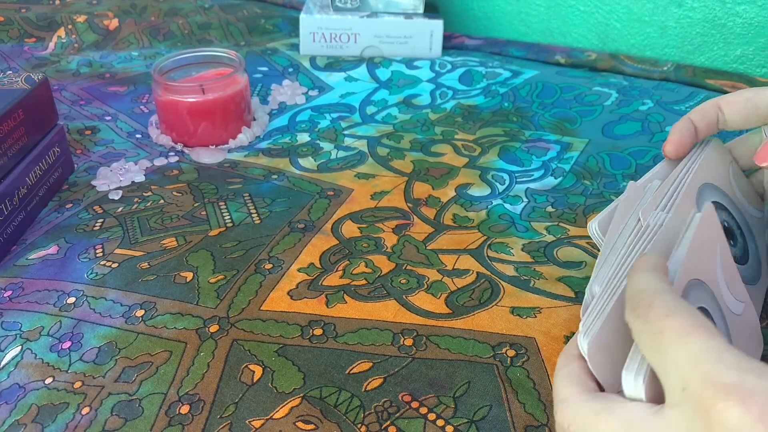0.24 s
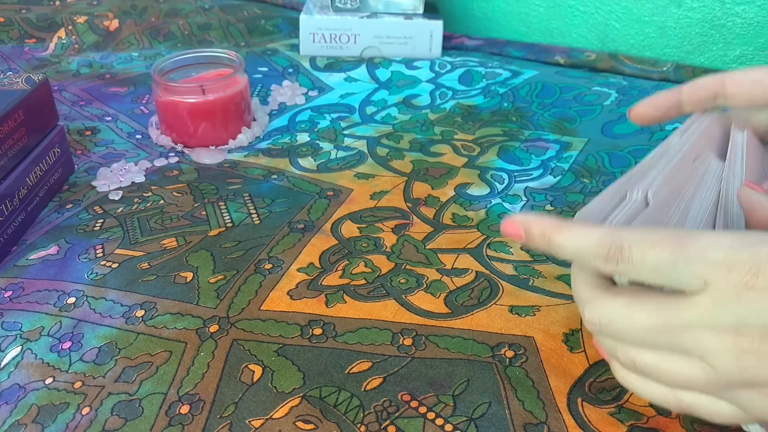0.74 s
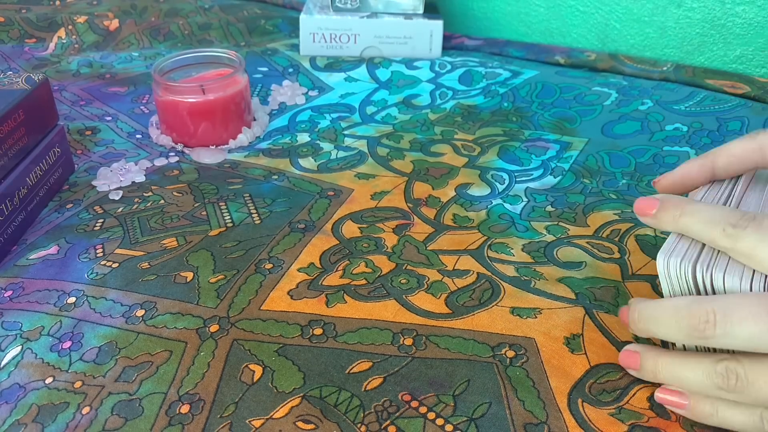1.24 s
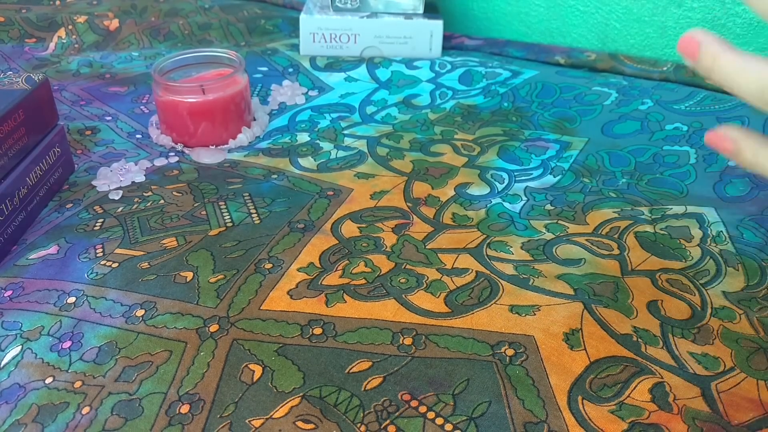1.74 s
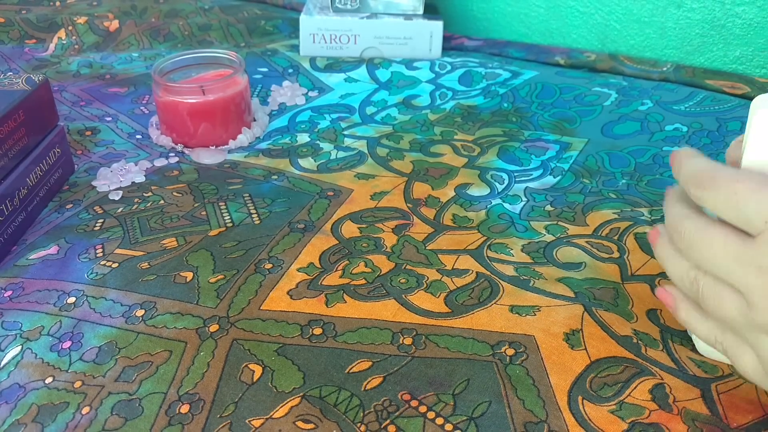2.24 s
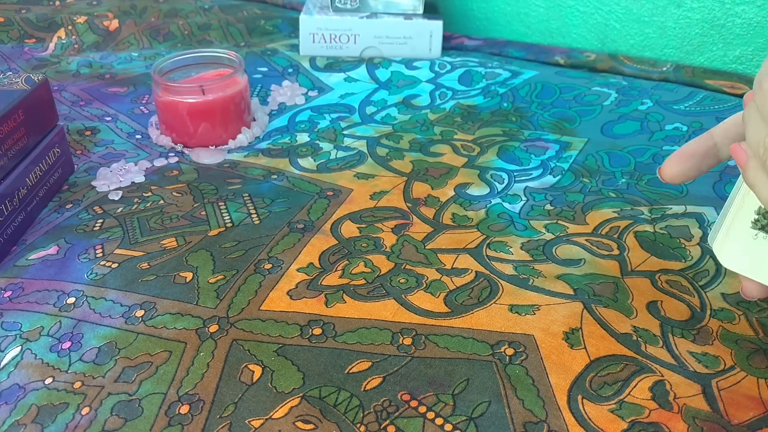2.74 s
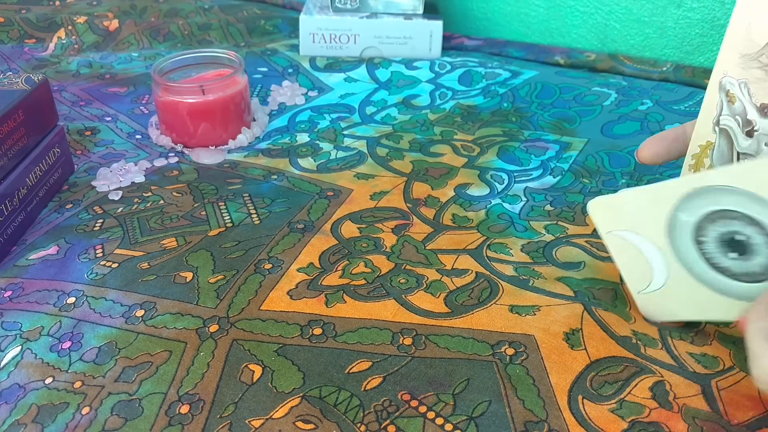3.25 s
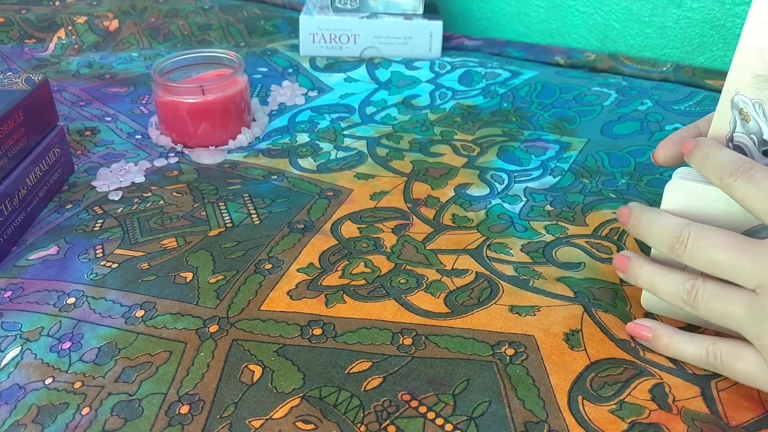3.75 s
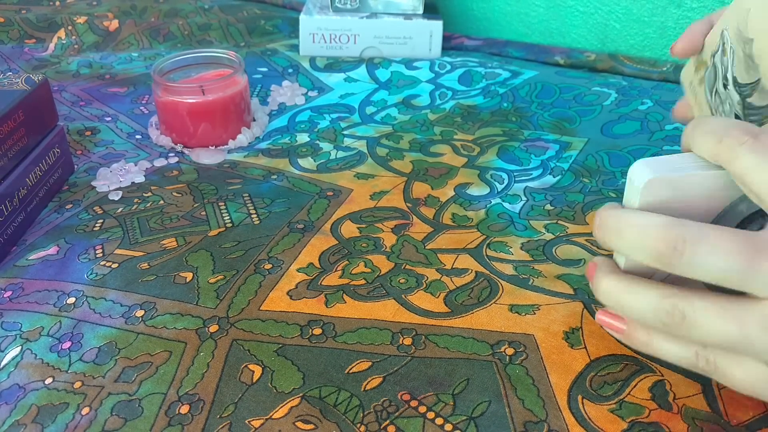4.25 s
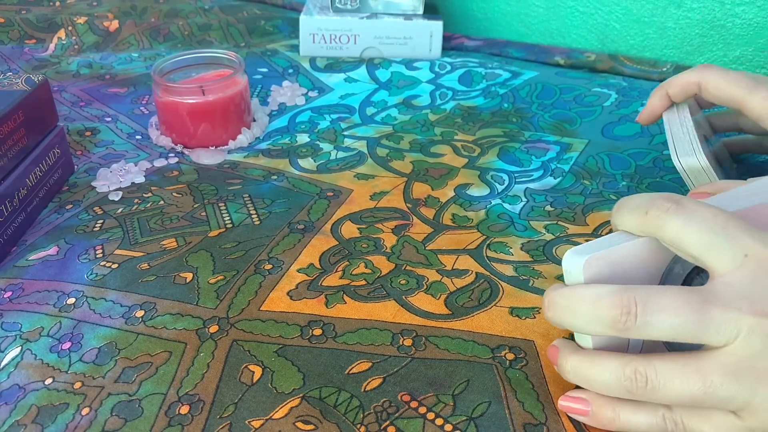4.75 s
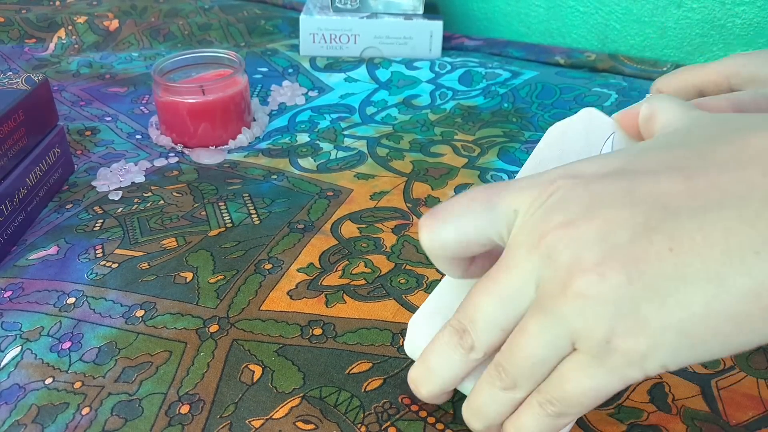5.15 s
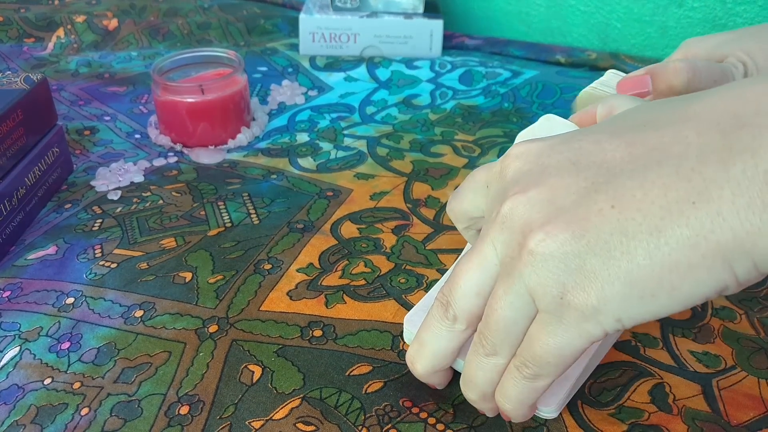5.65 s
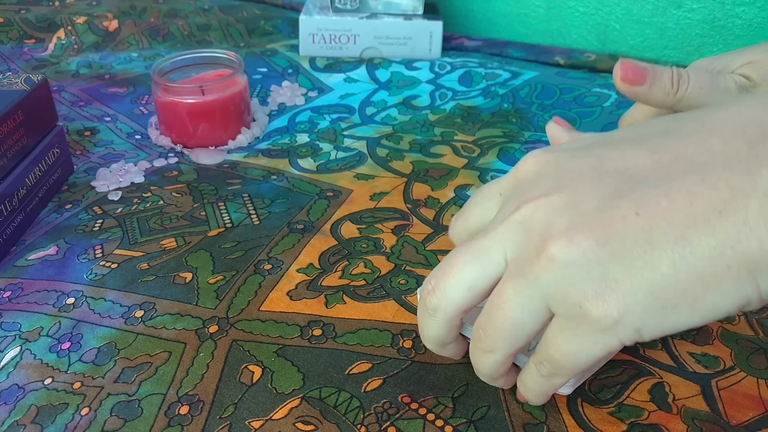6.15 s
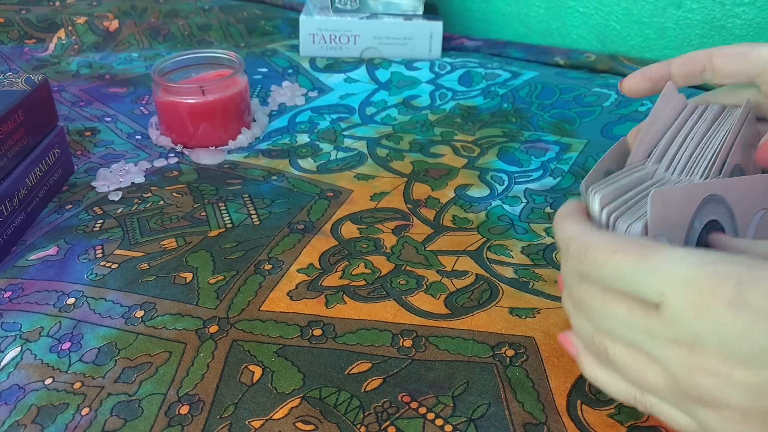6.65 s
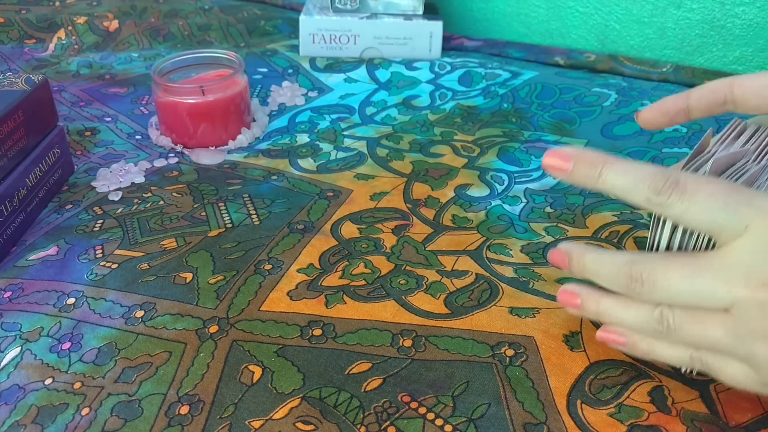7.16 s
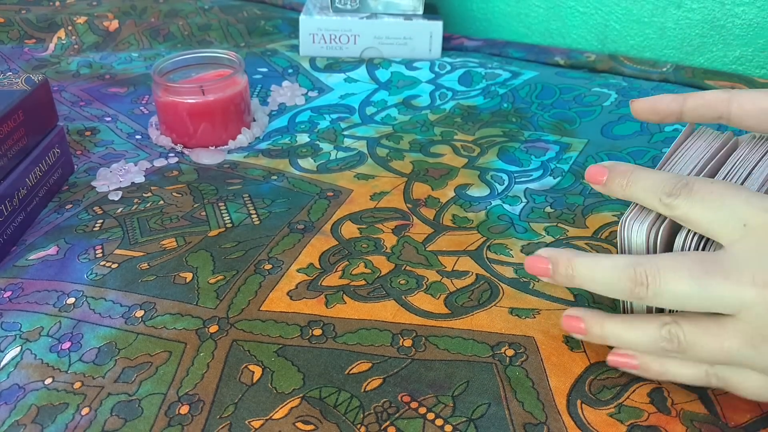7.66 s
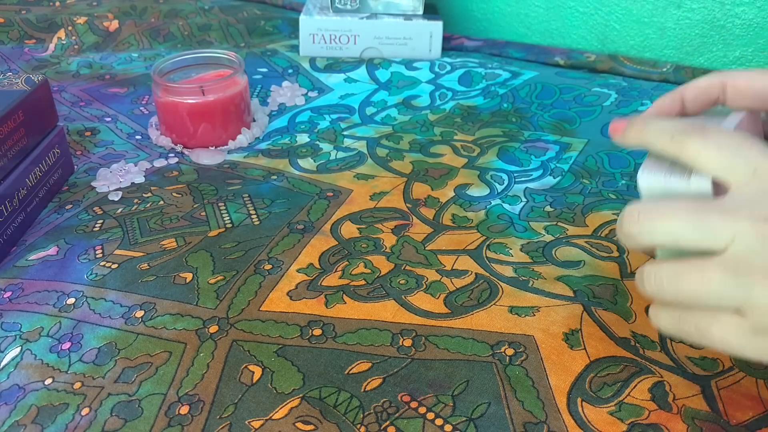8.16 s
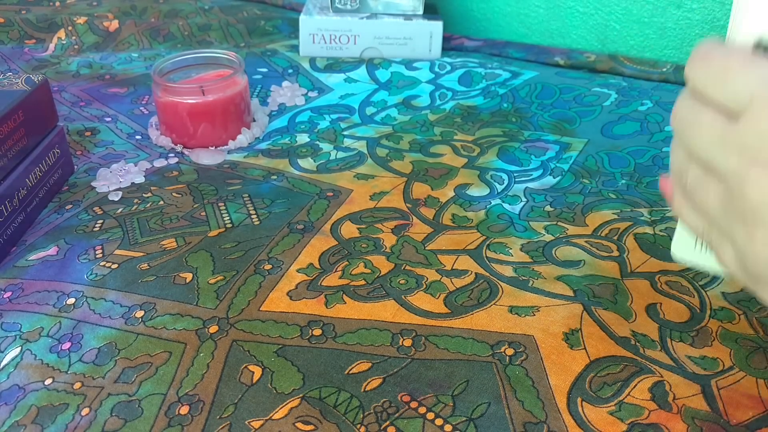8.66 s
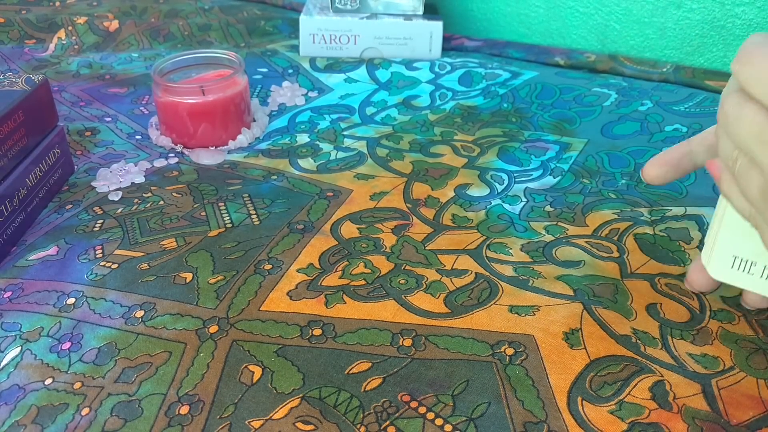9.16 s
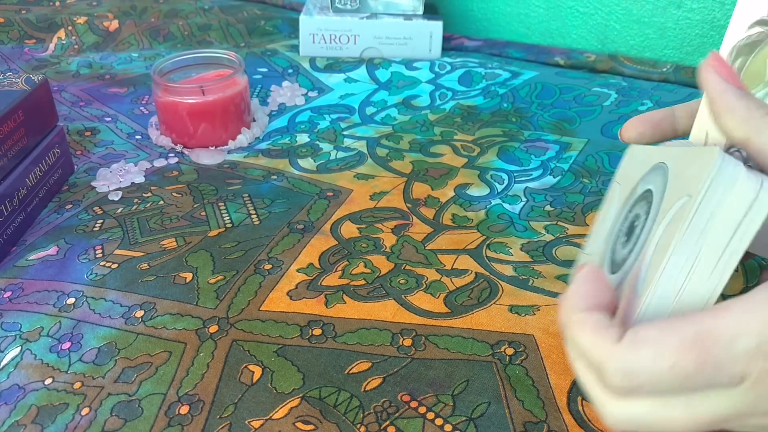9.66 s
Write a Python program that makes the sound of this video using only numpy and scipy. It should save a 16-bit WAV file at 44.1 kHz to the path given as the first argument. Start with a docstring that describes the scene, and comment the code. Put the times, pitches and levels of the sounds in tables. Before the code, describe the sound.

A deck of cards is handled close to a stereo microphone, a little to the right, in a nearly dry space. A low wavering motor hum, street rumble and soft hiss run throughout. Far, echoing dog barks come at 0 and 0.7 s. Cards click and knock sharply around 0.3 s, then brush and tap lightly until 1.5 s. At 2 s a distant two-tone car horn toots briefly. Small clicks come at 3.2-3.5 s, tiny faint peeps are scattered about, and a low rumble swells near 4.8 s. From 5.7 s the cards riffle: separate snaps thicken into a rapid, brightening crackle, loudest near 6.17 s, ending in a papery swish by 6.25 s. The background drops abruptly and creeps back over two seconds. Soft slides follow at 6.8-7.3 s, with a click at 8.36 s, faint barks at 8.2, 9.1 and 9.6 s, and a last tap at 9.8 s.

```python
"""Playing-card sounds: a deck shuffled by hand over a cloth-covered table, built from shaped noise and ringing.
Packets slide as grainy hiss, tap as struck bursts, and riffle once in a run of snaps.
Behind: wavering machine tones, street noise under hiss, a far dog's voiced barks, one two-tone car horn toot,
faint trilled peeps and one swell of low rumble.
The microphone's gain control ducks under the riffle and creeps back over two seconds."""
import sys
import numpy as np
from scipy import signal
from scipy.fft import rfft, irfft, next_fast_len
from scipy.io import wavfile
from scipy.ndimage import map_coordinates

SR = 44100
rng = np.random.default_rng(int(sys.argv[2]) if len(sys.argv) > 2 else 0)


def generate_wav(signal):
    """Clip the signal to [-1, 1] and save it as 16-bit WAV at the path in sys.argv[1]."""
    frames = np.transpose(np.atleast_2d(signal))
    scaled = np.clip(frames, -1, 1) * 32767
    pcm = np.round(scaled).astype(np.int16)
    wavfile.write(sys.argv[1], SR, pcm)


N = 437472

# Colours, bells and levels are relative dB; later gains and filters apply.
# three motors: (mean pitch [Hz], line width [Hz])
MOTOR_LINES = [(121, 2.69), (154.2, 3.95), (173.5, 6.98)]
# motor levels before swell: (time [s], first, second, third motor level [dB])
MOTOR_LEVELS = [(0, -49, -41.5, -61), (.6, -45.5, -49, -44.5), (1.2, -46, -42.5, -51),
                (2.2, -46.5, -42, -44), (3.2, -48, -46, -47), (4.4, -43.5, -45, -50.5),
                (5.5, -47.5, -44, -51), (6.3, -42, -51.5, -55), (8.2, -45.5, -42, -47),
                (9.2, -40.5, -46.5, -48), (9.9, -39.5, -45.5, -53)]
# weaker fan tones: (mean pitch [Hz], level [dB], line width [Hz])
FAN_LINES = [(244.4, -51.5, 7.04), (294.2, -51.5, 7.04), (309.2, -54.5, 8.13), (356.7, -56, 8.22),
             (413.7, -58, 9.16), (672.4, -61.5, 7.53)]
# street noise and hiss: (frequency [Hz], density [dB per Hz])
AIR_COLOUR = [(20, -33), (35, -24), (55, -9), (100, -0.5), (200, -6.5), (340, -5.5), (520, -13.5),
              (900, -17), (1600, -23), (1950, -22.5), (2300, -25), (2750, -26.5), (5000, -27.5),
              (8300, -31), (9800, -32), (11200, -39), (12400, -30.5), (13500, -38.5), (15000, -41.5)]
# left-right correlation of the background noise, channels opposite near 2.3 kHz:
# (frequency [Hz], correlation [-1..1])
NOISE_CORRELATION = [(130, 0.59), (280, 0.73), (640, 1), (1400, 0.84), (1950, -0.72), (2150, -1),
                     (2450, -1), (2700, 0.078), (3300, 0.74), (4500, -0.64), (6000, 0.063), (15000, -0.048)]
# far barks: (start [s], level [dB], pitch before arch [Hz], throat resonance shift [ratio])
BARKS = [(0.0, -45.5, 375, 1.06), (0.695, -43.5, 381.4, 1.04), (8.177, -42, 370.6, 1),
         (9.11, -41, 355.2, .91), (9.597, -48.5, 354, 0.93)]
# dog's throat: (frequency [Hz], density [dB per Hz])
THROAT_COLOUR = [(200, -33), (500, 4.5), (800, -4.5), (980, 2.5), (1090, 7.5), (1280, -3.5), (1650, -5),
                 (1950, -22), (4000, -42)]
# reverberation down the street: (frequency [Hz], t60 [s])
STREET_DECAY = [(300, 0.97), (750, .65), (1080, 0.94), (1700, 0.75), (6000, 0.13)]
# packets sliding over each other: (time at fastest [s], level [dB], stroke length [s])
SLIDES = [(0.023, -48, 0.039), (0.131, -47, 0.093), (0.567, -45, 0.14), (0.879, -49, 0.073),
          (1.105, -47.5, 0.068), (1.156, -37, 0.052), (1.297, -52.5, 0.23), (1.538, -55.5, 0.16),
          (1.906, -48, 0.075), (2.205, -48.5, 0.067), (2.963, -54, 0.11), (3.52, -56, 0.37),
          (4.545, -53, 0.023), (6.17, -23, 0.025), (6.223, -27, 0.038), (6.764, -39, 0.086),
          (7.051, -43.5, 0.14), (7.289, -43, 0.05), (8.159, -43.5, 0.051), (8.583, -50.5, 0.067),
          (8.882, -50.5, 0.054), (9.485, -51.5, 0.05), (9.912, -50.5, 0.12)]
# card's sliding face: (frequency [Hz], density [dB per Hz])
SLIDE_COLOUR = [(300, -17), (2000, -45), (3000, 3.5), (3800, 2), (5000, 0), (7300, 3.5), (10000, -1),
                (15000, -12.5)]
# packets landing on the deck or being squared: (time [s], edge click [dB over 10 ms], knock [dB over 10 ms],
# rattle length [s], brightness [dB per octave], body [dB],
# low ring [Hz], low ring [dB], high ring [Hz], high ring [dB])
TAPS = [(0.1574, -40.5, -40, 0.005, -3.5, -7.5, 1960, 4.0, 2750, 3),
        (0.2858, -28, -51, 0.0017, 4, 18, 3270, 10, 8300, 9),
        (0.2874, -31, -23.5, 0.004, -5.0, 5.5, 1000, 6, 1820, 7),
        (0.3018, -28.5, -56, 0.00052, -0.5, -3.5, 7140, 8, 8940, 0),
        (0.5753, -40.5, -55, 0.005, -2, -6, 6800, 5, 8940, 11),
        (1.088, -47, -37.5, 0.003, -13, -21, 7550, 5.0, 10000, 11.0),
        (1.4717, -49, -32.5, 0.004, -5, -26, 1120, 3, 7990, 7),
        (3.2357, -35, -54, 0.00094, -1, 3, 1840, 4.5, 7550, 9),
        (3.271, -49, -60, 0.00073, -3, -12, 1850, 7.0, 5700, 4),
        (3.3678, -38, -54, 0.0011, -5, -15, 6340, 3, 10000, 8.0),
        (3.466, -57, -35.5, 0.00354, 4, -15.5, 1000, 0, 10000, 12),
        (5.2719, -46, -60, 0.002, -5.5, -14, 1570, 10, 7140, 4),
        (5.712, -43.5, -40, 0.003, -8, -6, 1000, 2, 1320, 5),
        (5.826, -41.5, -35.5, 0.0026, -11, -10, 1400, 11, 10000, 12.0),
        (8.3587, -37.5, -49, 0.00292, -2.5, -9.5, 4070, 7, 8400, 7),
        (9.8142, -38.5, -42, 0.002, -3.5, -3, 3660, 6, 6380, 13.0)]
# cards flicking off the thumb; each bend rings at two pitches: (time [s], snap [dB over 10 ms],
# rattle length [s], brightness [dB per octave], body [dB],
# low ring [Hz], low ring [dB], high ring [Hz], high ring [dB])
RIFFLE = [(5.687, -31.5, 0.0033, -0.5, -2.5, 3420, 10, 7900, 2),
          (5.7405, -24.5, 0.0028, 0, 7.5, 1000, 3, 8940, 3),
          (5.775, -21, 0.0021, -1.0, 2.5, 3680, 8.5, 6960, 11.5),
          (5.785, -32, 0.002, -7, -16, 1750, 4, 7550, 5.0),
          (5.8564, -31.5, 0.0031, -2.5, -4, 2060, 5, 2750, 4),
          (5.8735, -19.5, 0.00151, -3.5, -5, 2440, 5.0, 4280, 2),
          (5.912, -18.5, 0.0013, 2.5, 14.5, 1000, 2, 8700, 12),
          (5.926, -24, 0.00246, 1, 2, 1480, 2, 6030, 6), (5.965, -26.5, 0.0025, 1, 3, 6750, 1, 8400, 6),
          (5.9805, -29, 0.00298, -2, 0.0, 3070, 3.5, 10100, 12),
          (5.9896, -19.5, 0.00055, -1.5, -2, 990, 1, 6840, 4.5),
          (5.999, -43, 0.0023, -2.5, -14, 5070, 4, 7990, 7),
          (6.0257, -18, 0.0022, -2.5, 7, 4270, 17, 6300, 5),
          (6.0279, -15, 0.00197, -1, -9, 2920, 18.5, 3850, 10.0),
          (6.0321, -17.5, 0.001, 1.5, 7, 4900, 12, 6750, 9),
          (6.0475, -17, 0.003, 4.5, -2.0, 4820, 7.5, 6380, 6.5),
          (6.054, -28.5, 0.002, -7.0, -5, 1000, 5.5, 7990, 10),
          (6.075, -20, 0.002, 2, 0, 4310, 11, 7550, 2.0), (6.088, -21, 0.00299, -4, -12, 6380, 3, 8450, 5),
          (6.1022, -17, 0.0023, 0.5, 5.0, 4310, 7, 7990, 8),
          (6.118, -31, 0.0015, -12, -19, 1000, 2.5, 8940, 7.5),
          (6.128, -15, 0.003, 1.5, 7.5, 3880, 9, 4820, 2), (6.1423, -20, 0.002, -6, -3, 1750, 9, 7990, 8),
          (6.1509, -12.5, 0.002, 2.5, 7.0, 2910, 11, 4260, 7),
          (6.155, -14.5, 0.002, 5, 8.5, 6750, 5, 9000, 3), (6.1714, -9.5, 0.002, 0, -3, 4560, -2, 5600, 9),
          (6.1739, -7.5, 0.00199, -2, -1, 4930, 3, 7550, 6),
          (6.184, -21.5, 0.004, 0, -1, 1000, 4.5, 5100, 1),
          (6.197, -22, 0.0055, -3.5, -9, 1750, 12, 6380, 4.5),
          (6.2197, -19.5, 0.00069, -6, -10.5, 6350, 10, 7990, 13)]
# held deck when knocked: (mean pitch [Hz], mean level [dB], t60 [s])
DECK_MODES = [(225, -3.5, 0.038), (309, -2.5, 0.052), (422, 8, 0.014), (623, -5.5, 0.029),
              (1186, -12, 0.025), (1690, -16, 0.0095)]
# card's snap: (frequency [Hz], density [dB per Hz])
SNAP_COLOUR = [(60, -43), (250, -4), (800, 1), (1550, 6.5), (2400, -1.5), (3300, 1.5), (5500, 2.5),
               (8300, 1.5), (11000, -4.5), (15000, -7.5)]
# faint far peeps: (time [s], level [dB], mean pitch [Hz], half length [s])
CHIRPS = [(0.338, -50, 3540, 0.0067), (0.387, -56, 3700, .007), (1.577, -58.5, 3110, 0.15),
          (2.36, -52, 3500, .02), (3.507, -46.5, 3500, 0.0086), (4.037, -47, 4050, 0.0084),
          (4.039, -49, 2830, 0.01), (4.098, -49, 3600, 0.0098), (5.452, -50.5, 5640, 0.019),
          (8.52, -57, 3000, 0.059), (8.822, -52, 3370, 0.013)]
# car's two horns: (pitch before sag and flutter [Hz], level [dB], start [s])
HORNS = [(425.5, -1, 2.0), (484, -0.5, 2.02)]
# horn flare: (frequency [Hz], gain [dB])
FLARE_GAIN = [(425, 5.5), (485, 0), (850, -1.5), (970, -2), (1350, 2.5), (1700, -4.5), (1930, -4),
              (2150, -15), (2420, -14), (3000, -9), (3400, -10), (3900, -13), (4600, -26), (6000, -12),
              (8000, -51)]
# low rumble: (frequency [Hz], density [dB per Hz])
RUMBLE_COLOUR = [(25, -34), (55, -2), (80, 7), (105, 17), (150, -5), (300, -52.5)]
# table top and a wall near the hands: (delay [s], gain [dB])
NEAR_ECHOES = [(.0021, -19), (.0046, -18), (.0098, -17)]
# reverberation near the table: (frequency [Hz], t60 [s])
ROOM_DECAY = [(200, 0.11), (2000, 0.16), (12000, 0.24)]
# hands' gain at the left port, opposite at the right: (frequency [Hz], gain [dB])
FACING_GAIN = [(400, -0.6), (750, -1), (1250, 0.5), (2200, 0), (4000, -2.5), (12000, -2.5)]
# port mismatch: (frequency [Hz], left phase lead [radians])
PORT_PHASE = [(35, 0.49), (70, 2.02), (130, 1.81), (290, 1.02), (640, 0.95), (1300, -0.21), (2100, 0)]

BARK_S = 0.12
SLIDE_RISE_SHARE = 0.69
RATTLE_REF_S = 0.0019
BODY_HZ, BODY_OCTAVES, RING_OCTAVES = 1600, 0.42, 0.15
# riffle knocks grow with the snap and as the falling packets thicken
RIFFLE_KNOCK_DB, KNOCK_DB_PER_DB, KNOCK_DB_PER_S = -29.5, 0.5, 22.5
TOP_HZ = 15800


def amp(db):
    """Decibels to gain."""
    return 10 ** (np.asarray(db) / 20)


def unit(x):
    """Scale to rms 1."""
    return x / np.sqrt(np.mean(x ** 2) + 1e-20)


def along(points, hz):
    """Interpolate (Hz, value) points on a log-frequency axis."""
    f, v = np.transpose(points)
    return np.interp(np.log(hz + 1), np.log(f + 1), v)


def hump(hz, centre_hz, octaves):
    """A bell of height 1 on a log-frequency axis."""
    return np.exp(-.5 * (np.log2((hz + 1) / centre_hz) / octaves) ** 2)


def clock():
    """The time of each sample [s]."""
    return np.arange(N) / SR


def wobble(knots_per_s):
    """A smooth random curve through normal knots."""
    knots = rng.standard_normal(int(N * knots_per_s / SR) + 4)
    return map_coordinates(knots, [clock() * knots_per_s])


def filtered(x, response):
    """x through a complex response of frequency."""
    m = next_fast_len(N + SR // 2)
    return irfft(rfft(x, m) * response(np.fft.rfftfreq(m, 1 / SR)), m)[..., :N]


def causal(db):
    """Minimum-phase response with these gains: it rings only after it is struck."""
    cepstrum = irfft(np.log(amp(db)))
    half = len(cepstrum) // 2
    fold = np.r_[1, np.full(half - 1, 2), 1, np.zeros(half - 1)]
    return np.exp(rfft(cepstrum * fold))


def noise(colour, channels=2):
    """Unrelated coloured noises of rms 1."""
    white = rng.standard_normal((channels, N))
    return unit(filtered(white, lambda hz: amp(along(colour, hz))))


def burst(x):
    """Scale a short sound to the energy of 10 ms at rms 1."""
    return x * np.sqrt(SR / 100 / np.sum(np.mean(np.atleast_2d(x) ** 2, 0)))


def reverb(x, decay):
    """A diffuse stereo tail in which each frequency dies at its own speed."""
    hz, t, z = signal.stft(rng.standard_normal((2, SR)), SR, nperseg=256)
    dying = amp(-60 * t / along(decay, hz)[:, None])
    tail = signal.istft(z * dying, SR, nperseg=256)[1]
    return signal.fftconvolve(np.atleast_2d(x), tail / np.linalg.norm(tail[0]), axes=1)[:, :N]


def tone(hz, width_hz, waver):
    """A line of rms 1 that wavers in strength and phase."""
    drift = np.cumsum(wobble(9)) * np.pi * width_hz / SR
    strength = 1 + waver * wobble(14)
    return unit(strength * np.sin(2 * np.pi * hz * clock() + drift))


def hum(fans_db=-2, left_db=0.73, swell_db=1.6, swell_knots_per_s=2.52, diffuse=0.65):
    """Three motors swell and sink over a cluster of fan tones that arrive from all round."""
    time_s, *levels = np.transpose(MOTOR_LEVELS)
    motors = np.zeros(N)
    for (hz, width_hz), db in zip(MOTOR_LINES, levels):
        level_db = np.interp(clock(), time_s, db) + swell_db * wobble(swell_knots_per_s)
        motors += amp(level_db) * tone(hz, width_hz, waver=0.45)
    ahead, around = (sum(amp(db) * tone(hz, width_hz, waver=0.55) for hz, db, width_hz in FAN_LINES)
                     for _ in range(2))
    fans = ahead + diffuse * np.array([around, -around])
    return (motors + amp(fans_db) * fans) * amp([[left_db], [-left_db]])


def air(level_db=-42.5):
    """Street rumble under a steady hiss; the mid-side balance sets the left-right correlation."""
    def mid_side(hz):
        turn = np.arccos(np.clip(along(NOISE_CORRELATION, hz), -1, 1)) / 2
        return np.array([np.cos(turn), np.sin(turn)])

    mid, side = filtered(noise(AIR_COLOUR), mid_side)
    return amp(level_db) * unit(np.array([mid + side, mid - side]))


def dog(rough=0.54, level_db=-1, direct_db=-3, opening=0.092):
    """Hoarse arched barks, mostly street echo; the throat's resonances rise and fall with the jaw."""
    t, out = clock(), np.zeros(N)
    rasp, jitter = noise(THROAT_COLOUR, channels=1)[0], wobble(150)
    for s, db, hz, throat in BARKS:
        on = (t >= s) & (t < s + BARK_S)
        arch = np.abs(np.sin(np.pi * (t[on] - s) / BARK_S))
        shift = throat * (1 + opening * (arch - np.pi / 4))
        phase = 2 * np.pi * np.cumsum(hz * (0.81 + .14 * arch + 0.015 * jitter[on])) / SR
        voiced = unit(sum(amp(along(THROAT_COLOUR, k * hz / shift)) * np.sin(k * phase)
                          for k in range(1, 8)))
        # reading speed shifts the rasp's resonances
        shifted_rasp = np.interp(s * SR + np.cumsum(shift), np.arange(N), rasp)
        hoarse = shifted_rasp * (1 + .5 * np.cos(phase))
        out[on] += amp(db + level_db) * np.sqrt(arch) * unit((1 - rough) * voiced + rough * hoarse)
    echo = reverb(out, STREET_DECAY)
    return amp(direct_db) * out + 0.17 * echo + 0.81 * echo.mean(0)


def slides(grain_db=3, pressure_db=1.3, level_db=-1):
    """Card faces rub: a grainy hiss that swells and fades with each stroke."""
    t = clock()
    stroke = np.zeros(N)
    for s, db, length_s in SLIDES:
        side_s = length_s * np.where(t < s, SLIDE_RISE_SHARE, 1 - SLIDE_RISE_SHARE)
        stroke += amp(db) * np.exp(-((t - s) / side_s) ** 2)
    grain = unit(amp(grain_db * wobble(700) + pressure_db * wobble(40)))
    return amp(level_db) * stroke * grain * noise(SLIDE_COLOUR)


def contacts():
    """Every card contact, in the columns of TAPS; riffle knocks are computed."""
    start_s = RIFFLE[0][0]
    riffled = []
    for s, db, *shape in RIFFLE:
        knock_db = RIFFLE_KNOCK_DB + KNOCK_DB_PER_DB * db + KNOCK_DB_PER_S * (s - start_s)
        riffled.append((s, db, knock_db, *shape))
    return riffled + list(TAPS)


def snaps(spread=0.74, travel_share=0.271, rub_db=-2, rub_grows=1.13, attack_s=0.00068,
          tail_db=-16.0, tail_t60_s=0.063, scrape_db=-27, scrape_s=0.0091, bend_db=2.5):
    """A card scrapes, flicks, rattles on its neighbour and knocks the deck, ringing at its own pitches."""
    lead_in = SR // 100
    t = (np.arange(4096) - lead_in) / SR
    after = np.maximum(t, 0)
    onset = 1 - np.exp(-after / attack_s)
    dying = amp(tail_db - 60 * after / tail_t60_s)
    scrape = amp(scrape_db) * np.exp(-np.abs(t) / scrape_s)
    grid_hz = np.fft.rfftfreq(len(t), 1 / SR)
    octaves = np.log2(np.clip(grid_hz, 1500, 12000) / 4000)
    out = np.zeros((2, N + len(t)))
    for s, db, knock_db, rattle_s, brightness, body_db, low_hz, low_db, high_hz, high_db in contacts():
        i = round(s * SR) - lead_in
        rattle_s = max(rattle_s, .0002)
        # the flick crosses the card as a bending wave, treble first
        travel_cycles = 2 * travel_share * rattle_s * np.sqrt(grid_hz * 4000)
        flick = burst(irfft(np.exp(-2j * np.pi * (grid_hz * lead_in / SR + travel_cycles))))
        bend = map_coordinates(rng.standard_normal(64), [np.sqrt(grid_hz) / 4], mode="nearest")
        colour_db = along(SNAP_COLOUR, grid_hz) + brightness * octaves + bend_db * bend
        colour_db += body_db * hump(grid_hz, BODY_HZ, BODY_OCTAVES)
        colour_db += low_db * hump(grid_hz, low_hz, RING_OCTAVES)
        colour_db += high_db * hump(grid_hz, high_hz, RING_OCTAVES)
        fade = onset * (np.exp(-(after / rattle_s) ** 2) + dying) + scrape
        common, apart = rng.standard_normal((2, len(t)))
        rub = burst(fade * (common + spread * np.array([apart, -apart])))
        # the longer the rattle, the more it outweighs the flick
        rub_gain = amp(rub_db) * (rattle_s / RATTLE_REF_S) ** rub_grows
        card = irfft(rfft(flick + rub_gain * rub) * causal(colour_db))
        ring = np.zeros(len(t))
        for hz, level_db, t60_s in DECK_MODES:
            decay = amp(level_db + rng.normal(0, 0.57) - 60 * after / t60_s)
            ring += decay * np.sin(2 * np.pi * (hz * rng.normal(1, 0.087) * t + rng.random()))
        out[:, i:i + len(t)] += amp(db) * burst(card) + amp(knock_db) * burst(onset * ring)
    return out[:, :N]


def crackle(start_s=6.157, end_s=6.236, level_db=-35, size_db=4.5, life_s=0.00033, count=16):
    """As the last cards fall together, their edges tick softly: decaying noise at random times."""
    times_s = rng.uniform(start_s, end_s, count)
    sizes = amp(level_db + size_db * rng.standard_normal(count))
    kicks = np.bincount((times_s * SR).astype(int), sizes, N)[:N]
    tick = burst(np.exp(-np.arange(SR // 100) / SR / life_s))
    return signal.fftconvolve(kicks, tick)[:N] * noise(SNAP_COLOUR, channels=1)


def cards(room_db=-20, lead_s=0.0003416, shadow_hz=1900, lowest_hz=190):
    """The hands work to the right of the microphone; near surfaces and the room answer."""
    # small cards radiate little bass
    direct = filtered(snaps() + crackle() + slides(), lambda hz: (1j * hz / (lowest_hz + 1j * hz)) ** 2)

    def walls(hz):
        return 1 + sum(amp(db) * np.exp(-2j * np.pi * hz * delay_s) for delay_s, db in NEAR_ECHOES)

    def ports(hz):
        # the treble reaches the right port first
        lag_s = lead_s * hz ** 4 / (hz ** 4 + shadow_hz ** 4)
        left = amp(along(FACING_GAIN, hz)) * np.exp(-1j * np.pi * hz * lag_s)
        return left ** np.array([[1], [-1]])

    return filtered(direct, lambda hz: walls(hz) * ports(hz)) + amp(room_db) * reverb(direct, ROOM_DECAY)


def chirps(level_db=-1, trill=0.06):
    """Short trilled peeps, frequency-wobbled sines blurred by the street."""
    t = clock()
    warped_s = np.cumsum(1 + trill * wobble(500)) / SR
    peeps = np.zeros(N)
    for s, db, hz, half_s in CHIRPS:
        swell = np.exp(-((t - s) / half_s) ** 2)
        peeps += amp(db + level_db) * swell * np.sin(2 * np.pi * hz * warped_s)
    return peeps + 0.82 * reverb(peeps, STREET_DECAY)


def horn(peak_s=2.17, end_s=2.224, rise_s=0.022, fall_s=0.095, level_db=-41.0, swell_db=3, echo_db=-4.5,
         flutter=0.0077, sag=0.0055, air_db=4, wall_db=-7, wall_delay_s=0.022, doppler=0.0051):
    """A moving car's two diaphragms, a tone apart; a wall's Doppler-shifted answer beats on every overtone."""
    t, buzz = clock(), np.zeros(N)
    start_s = HORNS[0][2]
    release = np.exp(-np.maximum(t - end_s, 0) / fall_s)
    on = (t > start_s) & (t < end_s + 6 * fall_s)
    drive = np.interp(t, [start_s, peak_s, end_s], [-1, 0, -.5])
    for hz, db, s in HORNS:
        bend = 1 + sag * (drive[on] + .5) + flutter * wobble(140)[on]
        phase = 2 * np.pi * np.cumsum(hz * bend) / SR
        onset = np.clip((t[on] - s) / rise_s, 0, 1)
        for k in range(1, 17):
            waver = np.interp(t[on], start_s + np.arange(40) / 40, rng.standard_normal(40))
            overtone_db = db + along(FLARE_GAIN, k * hz) + air_db * waver
            buzz[on] += onset * amp(overtone_db) * np.sin(k * phase)
    toot = amp(level_db + swell_db * drive) * release * buzz / np.std(buzz[on])
    wall = amp(wall_db) * np.interp(t - wall_delay_s - doppler * (t - start_s), t, toot)
    return toot + wall + amp(echo_db) * reverb(toot, STREET_DECAY)


def rumble(peak_s=4.83, half_s=0.21, level_db=-44):
    """Low coloured noise swells once and passes."""
    swell = np.exp(-((clock() - peak_s) / half_s) ** 2)
    return amp(level_db) * swell * noise(RUMBLE_COLOUR, channels=1)


def scene():
    """Cards close by, the neighbourhood behind."""
    return hum() + air() + dog() + cards() + chirps() + horn() + rumble()


def gain_control(x, threshold_db=-25, release_db_per_s=8.5, deepest_db=16):
    """Loud sounds pull the gain down within about 20 ms; it recovers at a steady rate in dB."""
    window = np.ones(SR // 100) / (SR // 100)

    def smooth(v):
        return signal.fftconvolve(v, window)[:N]

    level_db = 10 * np.log10(np.abs(smooth(np.mean(x ** 2, 0))) + 1e-12)
    excess_db = np.clip(level_db - threshold_db, 0, deepest_db)
    recovery_db = release_db_per_s * clock()
    cut_db = np.maximum.accumulate(excess_db + recovery_db) - recovery_db
    return x * amp(-smooth(cut_db))


def record(dry):
    """The microphone: two ports unlike in phase, gain control and a band limit."""
    heard = filtered(dry, lambda hz: np.exp(.5j * along(PORT_PHASE, hz) * np.array([[1], [-1]])))
    return filtered(gain_control(heard), lambda hz: hz < TOP_HZ)


dry = scene()
out = record(dry)
generate_wav(out)
```